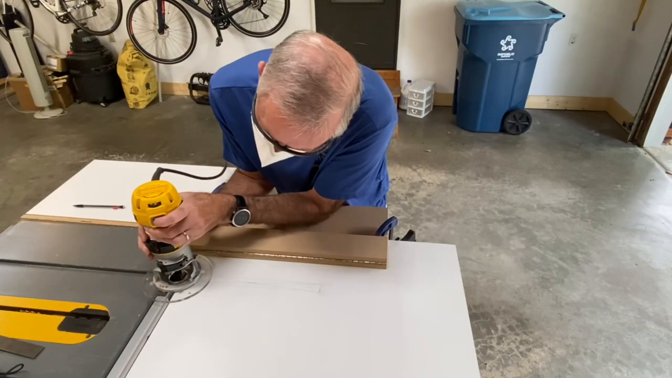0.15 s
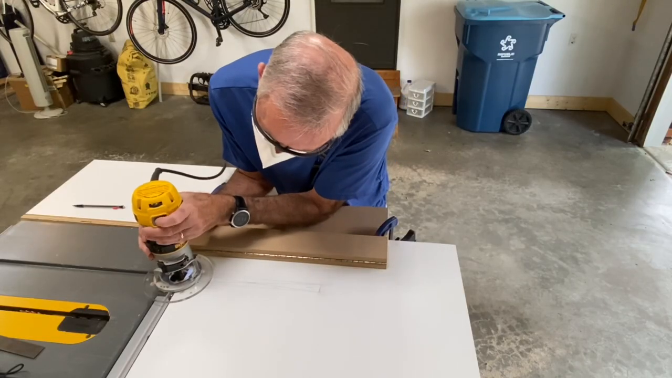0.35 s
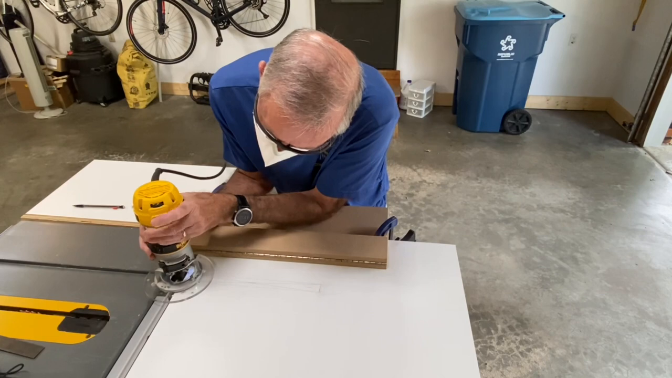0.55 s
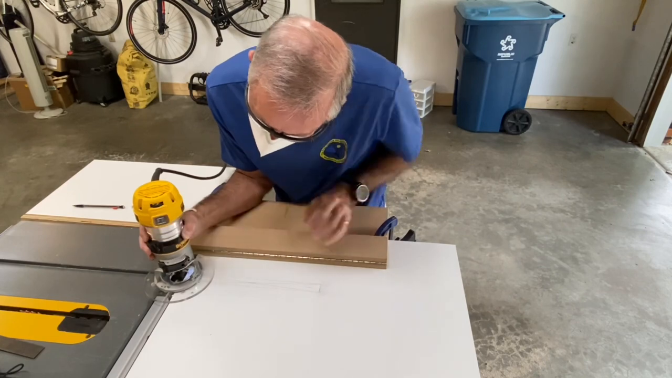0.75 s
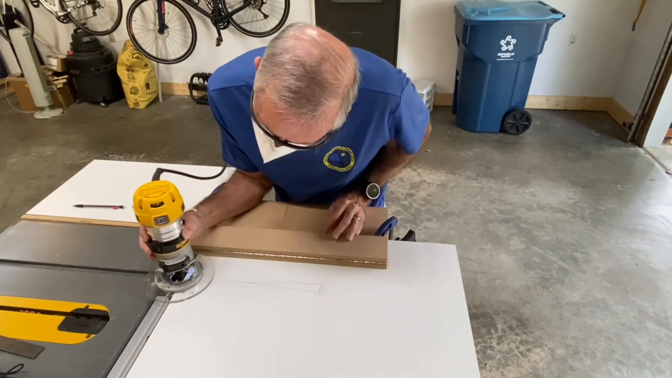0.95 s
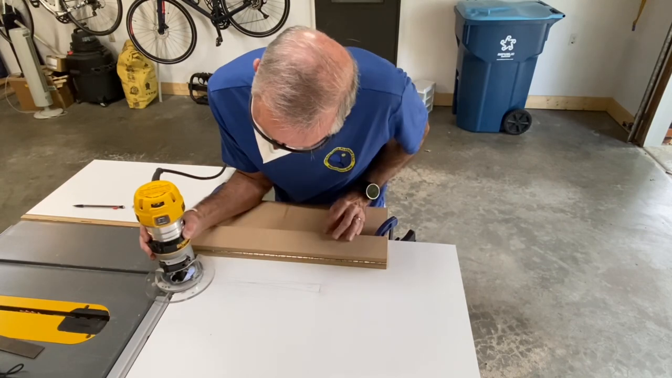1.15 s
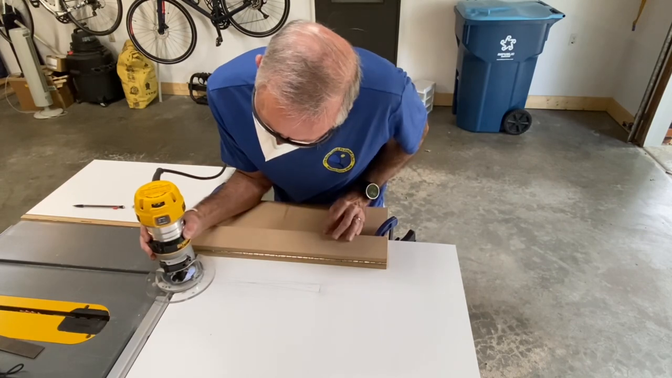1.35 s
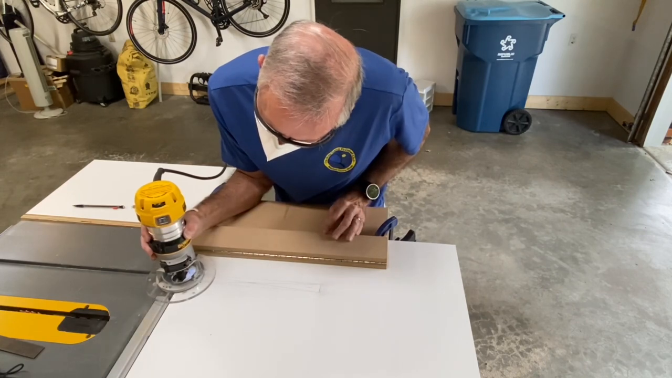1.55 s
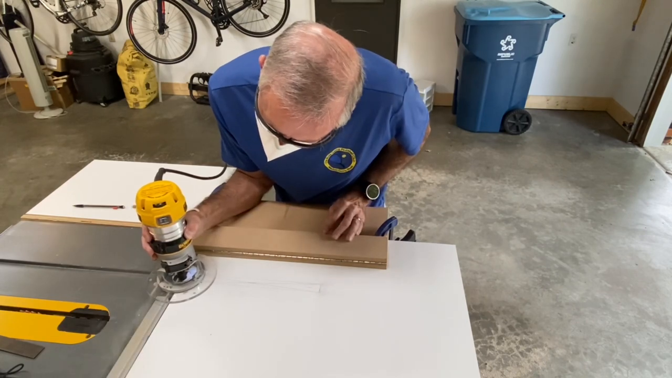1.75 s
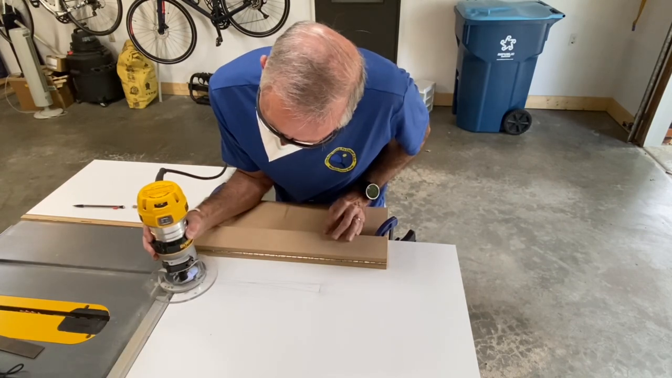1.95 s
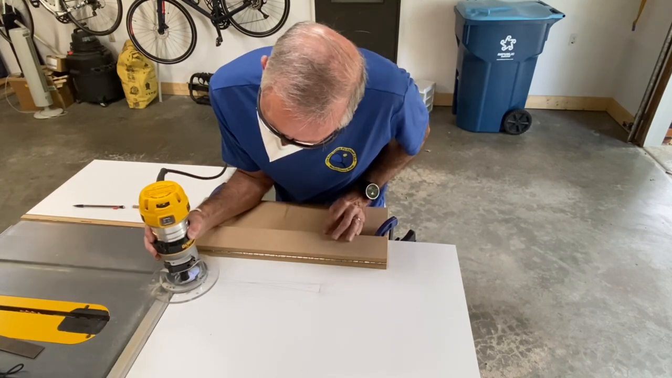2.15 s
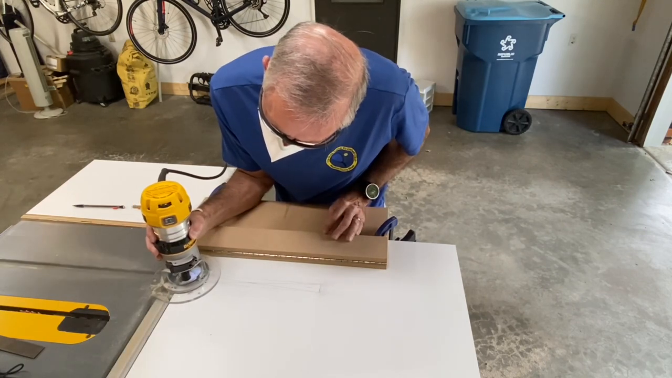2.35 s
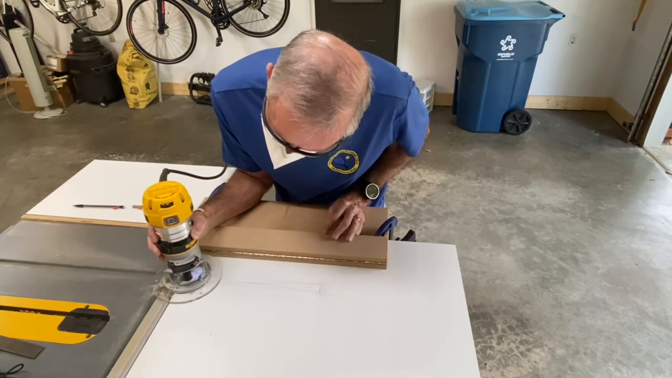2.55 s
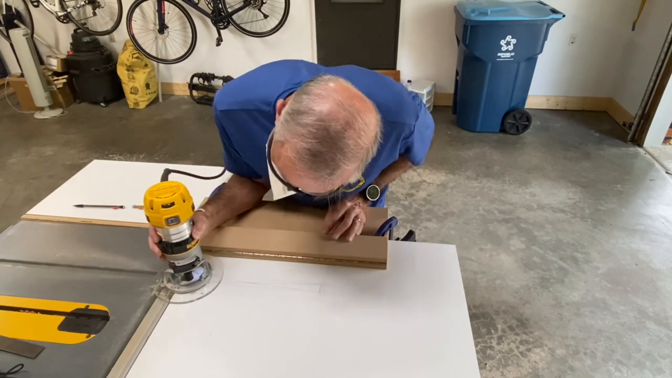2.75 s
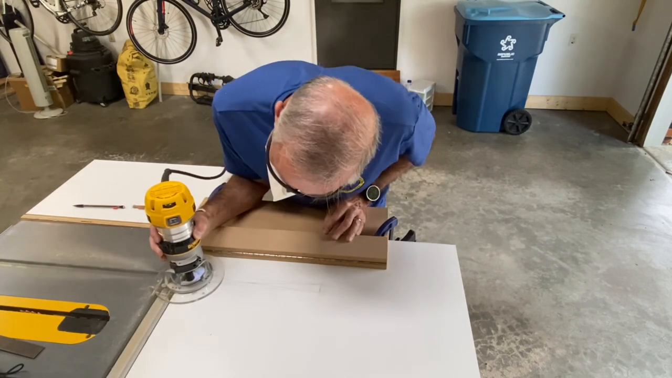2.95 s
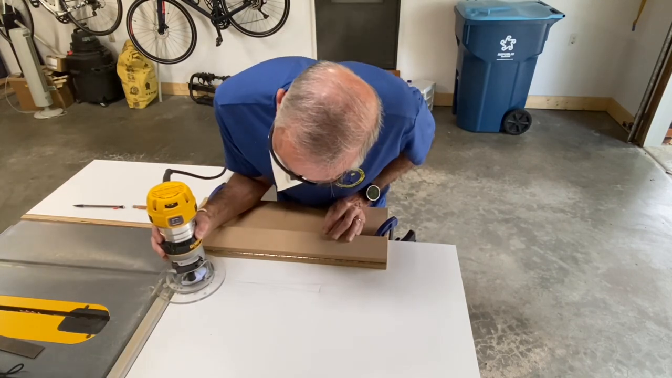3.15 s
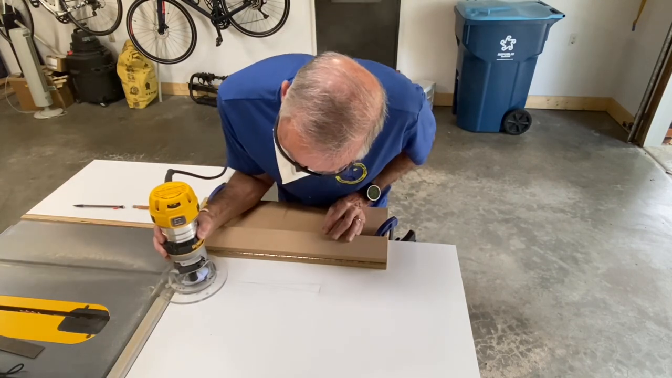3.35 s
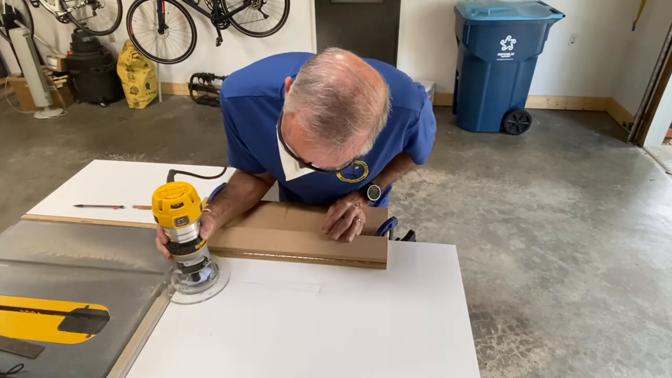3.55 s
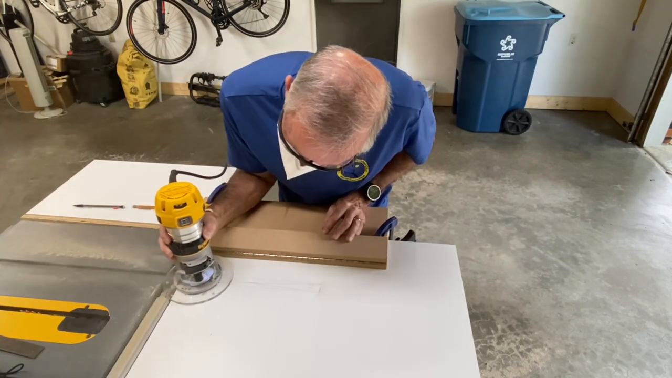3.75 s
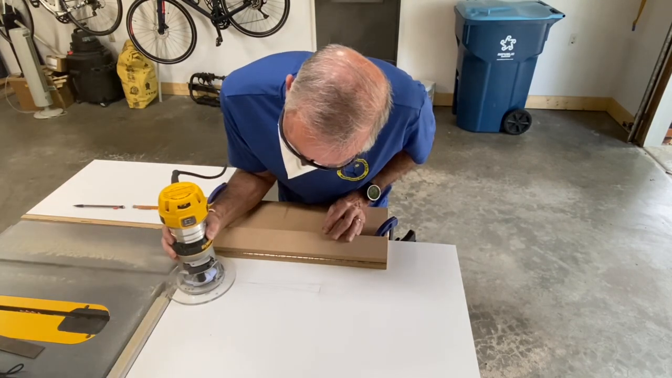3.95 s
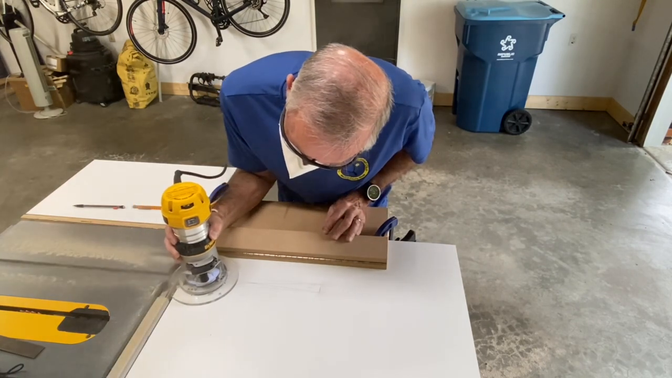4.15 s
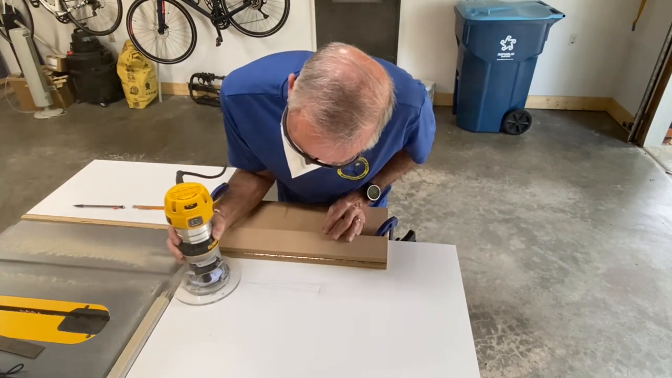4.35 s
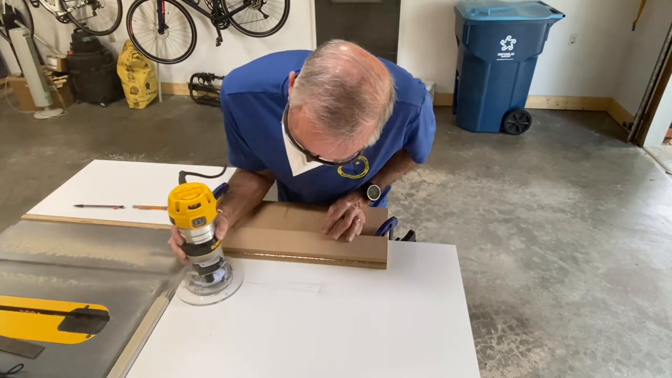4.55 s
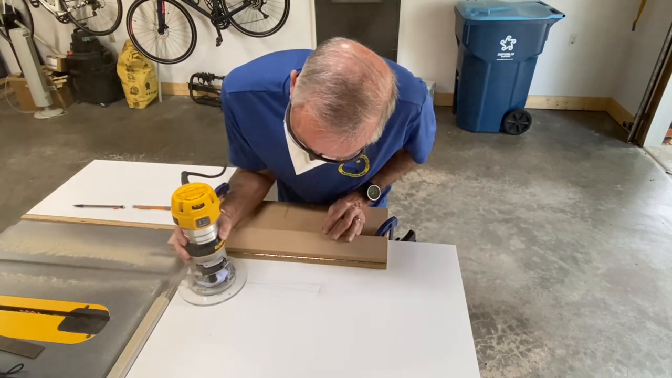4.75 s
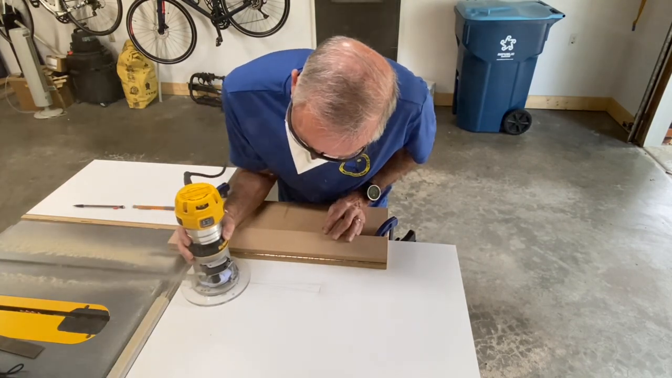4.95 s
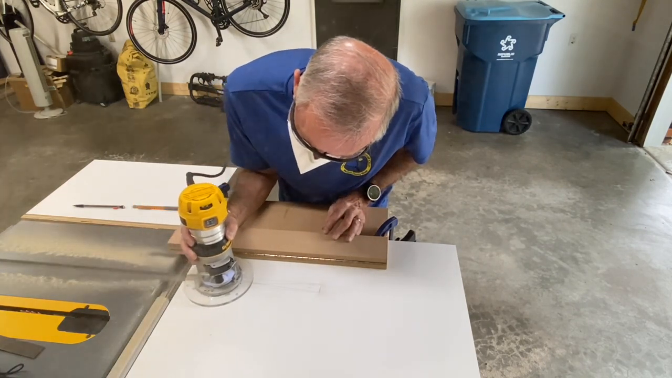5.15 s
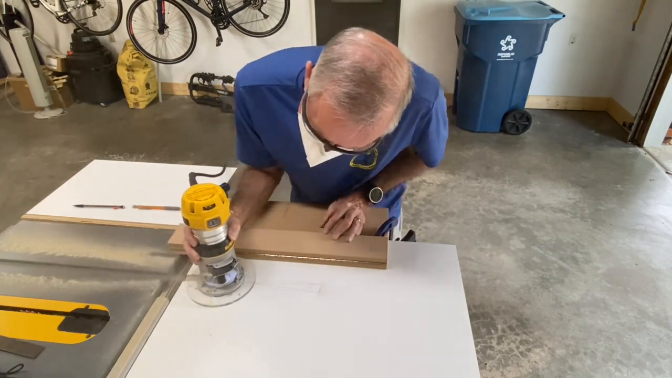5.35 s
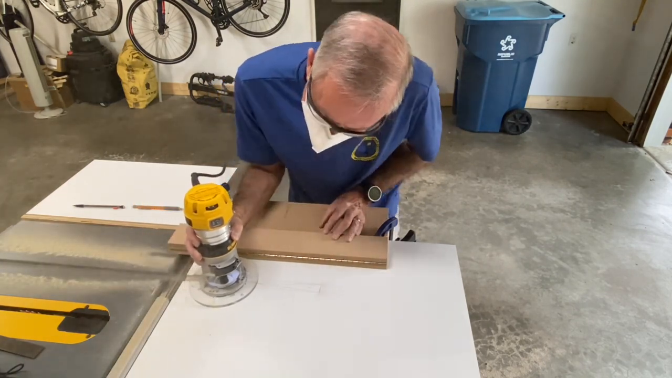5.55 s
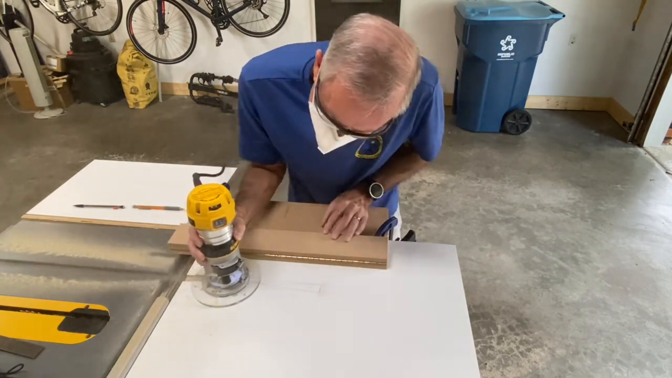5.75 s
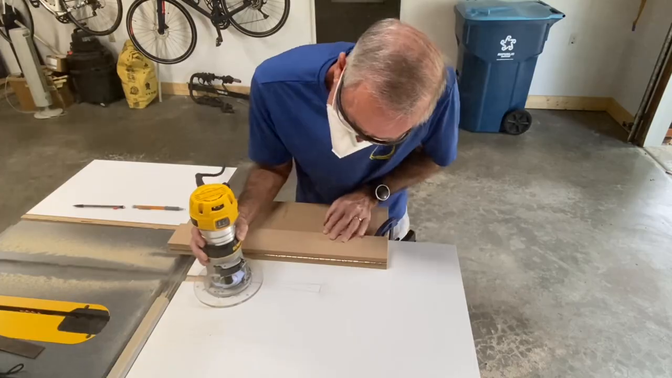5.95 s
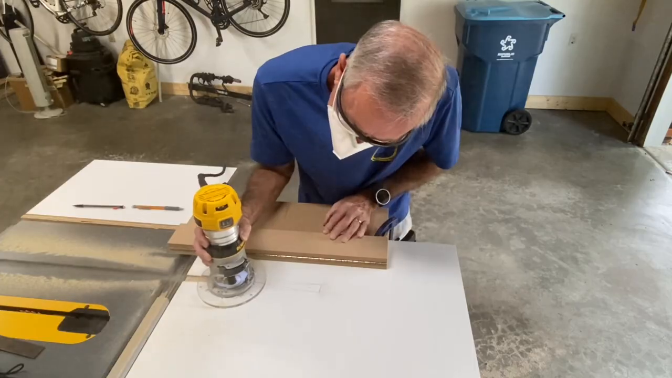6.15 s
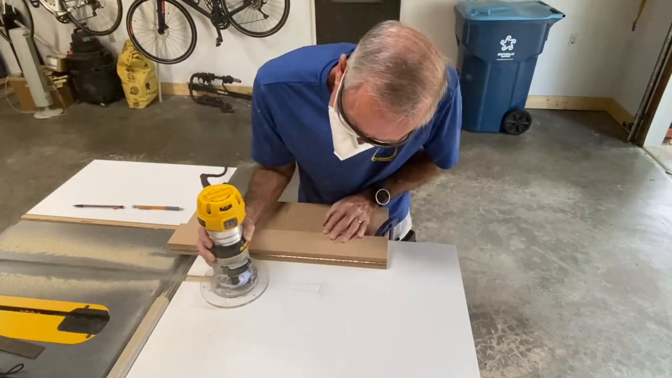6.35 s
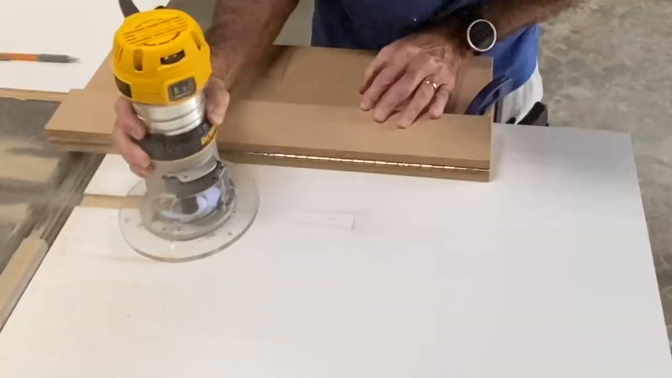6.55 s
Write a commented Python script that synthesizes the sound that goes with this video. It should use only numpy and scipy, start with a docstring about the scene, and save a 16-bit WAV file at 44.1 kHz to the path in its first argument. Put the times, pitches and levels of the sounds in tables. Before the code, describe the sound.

After a switch snaps, a router spins up to a loud high whine, then rasps and chatters through wood with hissing chips.

```python
"""In a quiet garage workshop a switch snaps and a hand-held router whines up to speed: pulsed motor current
makes the housing hum and the fan rushes. Near 0.9 s the cutter meets a wooden top with a soft thud, its
edges striking about 850 times a second; chips spray and the first bite screeches. From 1.5 s the tool
rocks and chatters against the cut, and the sound thickens as it is fed harder. A phone close by rounds
off the loudest peaks."""
import sys
import numpy as np
from scipy import signal
from scipy.fft import rfft, irfft, next_fast_len
from scipy.io import wavfile

SR = 44100
rng = np.random.default_rng(int(sys.argv[2]) if len(sys.argv) > 2 else 0)


def log_audio(samples):
    """Write samples as a 16-bit WAV file to the path given in sys.argv[1]."""
    # one column per channel
    frames = np.atleast_2d(samples).T
    # limit to full scale, then quantise
    limited = np.clip(frames, -1, 1)
    pcm = np.round(limited * 32767).astype(np.int16)
    wavfile.write(sys.argv[1], SR, pcm)


N = 291501
T = np.arange(N) / SR

# tone colour of the room, the switch, the fan and the chips: f/Hz, relative level/dB
ROOM_COLOUR = [(30, -8), (130, -1), (400, -9), (1600, -8.5), (2600, -21), (5000, -25), (7000, -34)]
SWITCH_COLOUR = [(300, -30), (1200, -22), (2200, -6), (3600, -5), (6000, -22), (10000, -3), (13000, 3),
                 (15500, -4)]
FAN_COLOUR = [(40, -33), (100, -18), (180, -14.5), (330, -11.5), (470, -6.5), (750, -9), (1200, -1),
              (1550, 0.0), (2300, 1), (3200, -5.5), (4800, -13), (6300, -10), (10500, -5), (15500, -11.5)]
CHIP_COLOUR = [(40, -27), (100, -34), (180, -22.9), (330, -19), (470, -17), (750, -10.5), (1200, -6),
               (1550, 0.0), (2300, -7), (3200, -7.5), (4800, -3.5), (6300, -8), (10500, -16),
               (15500, -13.5)]
# tick and snap of the switch: t/s, level/dB
CLICKS = [(.1785, -36), (0.1936, -20.5)]
# envelope of the motor hum: t/s, level/dB
HUM_LEVEL = [(.23, -79), (.265, -48), (.295, -40.5), (.34, -32), (.41, -45.5), (1, -50.5), (2, -39.5),
             (3.2, -40), (4.7, -35.5), (5.5, -41), (6.6, -50)]
# strike rate of the cutter's edges once spun up, sagging under load: t/s, f/Hz
EDGE_RATE = [(0.62, 885.5), (0.7, 889.8), (1.11, 855.4), (1.66, 843.6), (1.99, 841.9), (2.3, 852.4),
             (2.44, 852.6), (2.71, 869.9), (2.95, 862.5), (3.0, 855.2), (3.48, 835.8), (3.56, 850.4),
             (3.83, 854.4), (3.91, 844.8), (4.3, 864.9), (4.42, 851.0), (4.54, 859.2), (4.63, 852.8),
             (4.79, 859.4), (4.97, 848.0), (5.23, 876.5), (5.73, 865.4), (5.81, 872.5), (5.89, 855.9),
             (5.97, 859.8), (6.09, 840.8), (6.17, 848.4), (6.37, 842.6), (6.48, 831.7), (6.56, 847.0)]
# how hard the tool is fed, as strength of the tearing: t/s, level/dB
FEED = [(0.9, -38), (0.96, -41), (1.23, -43), (2.05, -31.5), (2.57, -32.5), (3.07, -32.5), (3.21, -28),
        (3.8, -29), (3.89, -27.5), (4.03, -28), (5.1, -28.5), (5.89, -27), (6.03, -28), (6.55, -28)]
# rate at which the tool rocks in the cut: t/s, f/Hz
ROCK_RATE = [(1.7, 239.2), (2.15, 207.9), (2.5, 210), (2.75, 186), (3.25, 203), (3.5, 228.8), (4.1, 218.2),
             (4.7, 239.7)]
# envelopes of the chatter: t/s, growl level/dB, squeal level/dB
CHATTER_LEVELS = [(1.5, -42, -42), (1.68, -31, -34), (2.1, -29.5, -26), (2.75, -23, -24.5),
                  (3.12, -25, -24), (3.19, -25, -19.5), (3.95, -23, -20.5), (4.75, -19.5, -23.5),
                  (5.12, -18, -22.5), (5.32, -20.5, -34), (5.55, -19.5, -26), (5.9, -19.5, -24),
                  (6.08, -26, -34), (6.6, -28, -36)]
# low, middle and high chatter voices, beside these partials: multiple of the edge rate, relative level/dB
GROWL = [(1, -10.5), (2, -.5), (3, -3.5)]
SQUEAL = [(4, 1.3)]
RASP = [(5, -1), (6, 2.5), (7, -3.5), (8, -15), (9, -10.5), (10, -9.5)]
# envelopes of the cutter's lowest partial and its loud octave: t/s, level/dB
FUNDAMENTAL_LEVEL = [(0.58, -25.5), (0.85, -30.5), (1.11, -23), (1.55, -30), (1.65, -42), (2.27, -28),
                     (4.34, -16), (5.88, -16.5), (6.13, -22.5), (6.58, -21.5)]
OCTAVE_LEVEL = [(0.58, -23.5), (1.06, -26.5), (1.45, -14), (2.13, -17.5), (2.4, -13), (3.37, -16.5),
                (3.89, -12.5), (3.95, -22), (4.0, -15), (4.97, -8.5), (5.26, -12), (5.69, -8.5),
                (5.79, -13), (5.91, -7), (6.58, -6)]
# the cutter's higher partials:
# multiple of the edge rate, level/dB in an ordinary cut, gain/dB per % of slowing, gain/dB per dB of feed
OVERTONES = [(3, -25, 2.3, -.1), (4, -28, 0, 0.3), (5, -21.5, 2, 0.6), (6, -29, 2, 0.27),
             (7, -27.5, 1.2, .45), (8, -41.5, 1.5, -0.5), (9, -36.5, 1.6, 0), (10, -42, 3, -.2),
             (11, -46.5, 2, 0.2), (12, -37.5, 2, 0.3), (14, -41.5, -2, 0.1), (15, -47, .5, 0),
             (16, -46, -2, 0), (17, -49, 0, 1), (18, -46, -2, 0)]
# a partial swells or sinks as the tool travels: start/s, end/s, multiple of the edge rate, gain/dB
SWELLS = [(.3, .93, 4, -16), (.3, 1.15, 5, -4), (.93, 1.35, 4, 5), (1, 3.15, 13, 4), (1.35, 1.9, 6, 9),
          (2.052, 2.55, 4, -6), (2.05, 2.55, 5, -6), (2.2, 2.65, 3, 3), (2.6, 3.097, 5, 3.5),
          (2.65, 2.95, 12, 13.5), (2.7, 3.25, 4, 4), (3, 3.6, 3, -3), (3.152, 3.6, 7, 5),
          (4.4, 4.95, 13, -8), (4.72, 4.88, 4, 11.5), (4.949, 5.4, 3, -7), (5.15, 5.45, 13, 4),
          (5.531, 5.7, 5, -12), (5.95, 6.7, 5, 3.5), (6, 6.7, 13, 3), (6.05, 6.7, 3, 4), (6.05, 6.7, 4, 3)]

POWER_ON_S, CONTACT_S = .233, .93  # cues: current flows, cutter meets wood
PULSE_HZ = 240  # pulses of the motor current
CUTTING_HZ, CUTTING_DB = 855, -28  # edge rate and feed of an ordinary cut


def undb(db):
    """Decibels to gain."""
    return np.exp(np.asarray(db) * (np.log(10) / 20))


def curves(table):
    """The columns of a time table as envelopes, one value a sample."""
    s, *columns = np.transpose(table)
    return [np.interp(T, s, c) for c in columns]


def unit(x):
    """Scale to rms 1."""
    return x / np.sqrt(np.mean(x ** 2))


def walk(rate):
    """A random drift of rms 1 that changes about rate times a second."""
    steps = rng.standard_normal(int(T[-1] * rate) + 3)
    return unit(np.interp(T, (np.arange(len(steps)) - rng.random()) / rate, steps))


def ramp(start_s, length_s):
    """Fade in from 0 to 1."""
    return np.clip((T - start_s) / length_s, 0, 1)


def swell(start_s, end_s, fade_s=.065):
    """Fade in, hold and fade out."""
    return ramp(start_s - fade_s / 2, fade_s) - ramp(end_s - fade_s / 2, fade_s)


def swells_db(order):
    """The level ride on one multiple of the edge rate."""
    return sum(db * swell(start, end) for start, end, k, db in SWELLS if round(k) == order)


def turn(hz):
    """Phase in radians of a changing rate."""
    return 2 * np.pi * np.cumsum(hz) / SR


def sine(phase, db):
    """A tone of the given rms level."""
    return np.sqrt(2) * undb(db) * np.sin(phase)


def colour(x, spectrum):
    """Equalise along points of f/Hz, level/dB."""
    hz, db = np.transpose(spectrum)
    size = next_fast_len(N)
    f = np.maximum(np.arange(size // 2 + 1) * SR / size, 1)
    gain = undb(np.interp(np.log(f), np.log(hz), db))
    return irfft(rfft(x, size) * gain, size)[:N]


def noise(spectrum):
    """Coloured noise of rms 1."""
    return unit(colour(rng.standard_normal(N), spectrum))


def ring(x, hz, width_hz):
    """One resonance, gain 1 at its centre."""
    return signal.lfilter(*signal.iirpeak(hz, hz / width_hz, fs=SR), x)


def dip(hiss, hz=7300, width_hz=1400, depth=.69):
    """A treble band of the hiss ducks briefly."""
    return hiss - depth * swell(2.68, 3.05) * ring(hiss, hz, width_hz)


def garage(x, wet_db, t60=.37):
    """Add the diffuse reverb of concrete floor and walls."""
    t = T[:SR // 2]
    tail = rng.standard_normal(len(t)) * undb(-60 * t / t60) * (t > .005)
    echo = signal.fftconvolve(x, tail / np.linalg.norm(tail))[:N]
    return (x + undb(wet_db) * echo) / np.hypot(1, undb(wet_db))


def room_tone(db=-57):
    """A faint, dark bed of steady noise."""
    return noise(ROOM_COLOUR) * undb(db)


def bump(hz=78, db=-44, decay_s=.03):
    """A soft thud in the table as the cutter meets the wood."""
    age = np.maximum(T - CONTACT_S, 0)
    return sine(2 * np.pi * hz * age, db) * np.exp(-age / decay_s)


def board(hz=410, width_hz=110, db=-42):
    """The cut shakes the wooden top, which drones in a broad low resonance."""
    drone = ring(ring(rng.standard_normal(N), hz, width_hz), hz, 2 * width_hz)
    return unit(drone) * undb(db + walk(14)) * ramp(.9, 1.5)


def switch(decay_s=.0008):
    """The rocker switch ticks, then snaps over."""
    snaps = sum(undb(db) * (T >= s) * np.exp(-np.abs(T - s) / decay_s) for s, db in CLICKS)
    return garage(noise(SWITCH_COLOUR) * snaps, wet_db=-16, t60=.3)


def hum(current, starting, buzz_db=-3):
    """Current pulses hum in the windings, with a gritty buzz during the soft start."""
    hum_db, = curves(HUM_LEVEL)
    grit = rng.standard_normal(N) * (2.4 + np.cos(current))
    grit = ring(ring(grit, 1300, 900), 1300, 900)
    buzz = unit(grit) * undb(buzz_db) * starting
    tone = sine(current, 0) + sine(2 * current, -10.5) + sine(3 * current, -17)
    return (tone + buzz) * (T > POWER_ON_S) * undb(hum_db + walk(15))


def commutator(phase, speed, current, starting, start_db=-23.5, run_db=-35.5, spark_db=-36):
    """The brushes whine on the bars; in the soft start they spark and the current chops the whine."""
    # the brushes bounce until the shaft is up to speed
    jitter = .3 * walk(60) + .3 * starting * walk(500)
    bars = 13 * phase + jitter
    # the overtones fade as they climb out of hearing
    overtones = sine(2 * bars, -8.5) + sine(3 * bars, -13) * (T < .39)
    overtones *= np.interp(T, [.32, .35, .42, .45], [0, 1, .7, 0])
    gate = 1 + 1.4 * starting * np.cos(current)
    whine_db = starting * start_db + (1 - starting) * (run_db + walk(5)) + swells_db(order=13)
    whine = (sine(bars, 0) + overtones) * gate * undb(whine_db + 1.2 * walk(25)) * speed ** 1.05
    sparking = starting * (T > POWER_ON_S) * (speed + .027) ** .73
    sparks = undb(spark_db) * rng.standard_normal(N) * sparking
    # both sound through two resonances of the housing
    brushes = whine + sparks
    housing = undb(14.5) * ring(brushes, 4620, 400) + undb(2) * ring(brushes, 7400, 900)
    return garage(.86 * whine + .5 * sparks + housing, wet_db=-11)


def fan(speed, db=-21.5, flutter_db=.7):
    """Cooling air rushes through the vents, rising steeply with speed."""
    return noise(FAN_COLOUR) * undb(db + flutter_db * walk(12)) * speed ** 1.8


def chips(phase, current, feed_db, roar_db=-22.5, hiss_db=-17.3, grain_db=2, split_hz=2800):
    """Fibres tear at every edge: the board roars and flying chips hiss, both growing with the feed."""
    bursts = (1 + .52 * np.cos(phase)) * (1 + .21 * np.cos(current))
    tearing = colour(rng.standard_normal(N) * bursts * undb(grain_db * walk(400)), CHIP_COLOUR)
    low = signal.sosfiltfilt(signal.butter(4, split_hz, fs=SR, output="sos"), tearing)
    roar = unit(low) * undb(roar_db + 1.24 * feed_db + 1.2 * walk(20))
    hiss = unit(tearing - low) * undb(hiss_db + feed_db + .6 * walk(20))
    return garage(roar + hiss, wet_db=-7) * ramp(CONTACT_S, .05)


def chatter(phase, feed_db, sway_hz=5, wobble_rad=.4, flank_db=-12):
    """The tool rocks unevenly against the cut: rough side tones, strongest just below the partials."""
    rock_hz, = curves(ROCK_RATE)
    growl_db, squeal_db = curves(CHATTER_LEVELS)
    rasp_db = -24.5 + .55 * feed_db
    rock = turn(rock_hz + sway_hz * walk(25))
    grab_db = 1.5 * walk(70)  # the edges grab and let go
    voices = [(GROWL, growl_db, 1.4), (SQUEAL, squeal_db, 2.1), (RASP, rasp_db, 1.5)]
    out = 0
    for orders, level_db, flicker_db in voices:
        for k, db in orders:
            tone_db = level_db + db + grab_db + flicker_db * walk(30)
            for side, side_db in [(-1, 0), (.98, flank_db)] + [(-2, flank_db)] * (k > 1):
                # each side tone reaches the phone with its own lag
                lag = rng.uniform(0, 2 * np.pi) + wobble_rad * walk(110)
                out = out + sine(k * phase + side * rock + lag, tone_db + side_db)
    return out * ramp(1.49, .3)


def cutter(phase, speed, current, slowing_percent, feed_db, wander_db=1.7, shimmer_db=3, smear_rad=.049):
    """Each edge strikes the wood: strong low partials and a thin, restless top that shifts with load."""
    def partial(k, db):
        """One multiple of the edge rate; its lag drifts as the tool moves and trembles with the grain."""
        return sine(k * phase + 2 * walk(1) + smear_rad * k * walk(60), db + walk(35))

    body = partial(1, curves(FUNDAMENTAL_LEVEL)[0]) + partial(2, curves(OCTAVE_LEVEL)[0])
    # from the sixth partial up: dull until the cutter is in, then the first clean bite screeches
    idle_db = -9 * (1 - ramp(CONTACT_S, .4))
    screech_db = 6.2 * swell(1.36, 1.7)
    top = 0
    for k, db, per_slowing, per_feed in OVERTONES:
        k = round(k)
        db = db + per_slowing * slowing_percent + per_feed * feed_db + swells_db(order=k)
        db = db + (idle_db + screech_db) * (k > 5)
        if k < 8:
            body = body + partial(k, db + wander_db * walk(7))
        else:
            top = top + partial(k, db + shimmer_db * walk(7))
    throb = 1 + .082 * np.cos(current)  # the torque follows the current pulses
    return (body + garage(top, wet_db=-11)) * throb * speed ** 2.8


def scene(spin_up_s=.187):
    """One shaft drives cutter, fan and commutator; the mix sits dead centre."""
    edge_hz, = curves(EDGE_RATE)
    feed_db = curves(FEED)[0] - CUTTING_DB
    slowing_percent = 100 * (1 - edge_hz / CUTTING_HZ)
    current = 2 * np.pi * PULSE_HZ * T  # phase of the pulses
    # the soft start brings the shaft up to speed along an S-curve
    speed = 1 - np.exp(-(np.maximum(T - POWER_ON_S, 0) / spin_up_s) ** 2.5)
    starting = 1 - ramp(.4, .17)
    # the grain of the wood tugs at the speed once the cutter is in
    tug_hz = 1.302 * walk(22) * ramp(1.6, 1.6)
    phase = turn(edge_hz * speed + tug_hz)
    cut = cutter(phase, speed, current, slowing_percent, feed_db) + chatter(phase, feed_db)
    motor = commutator(phase, speed, current, starting) + hum(current, starting)
    rush = dip(chips(phase, current, feed_db) + fan(speed))
    mix = cut + motor + rush + board() + switch() + bump() + room_tone()
    return np.array([mix, mix])


def record(dry, top_hz=15750):
    """The phone soft-clips peaks near full scale and cuts the top."""
    rounded = dry / (1 + dry ** 8) ** (1 / 8)
    return signal.sosfilt(signal.ellip(12, .2, 85, top_hz, fs=SR, output="sos"), rounded)


dry = scene()
out = record(dry)
log_audio(out)
```